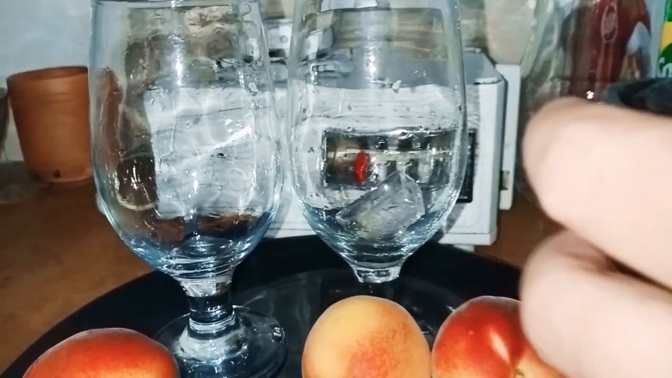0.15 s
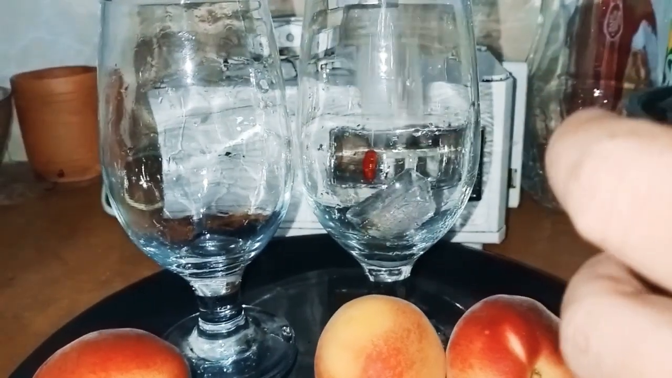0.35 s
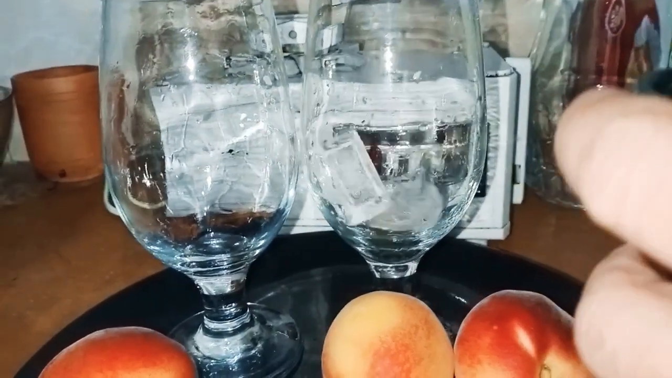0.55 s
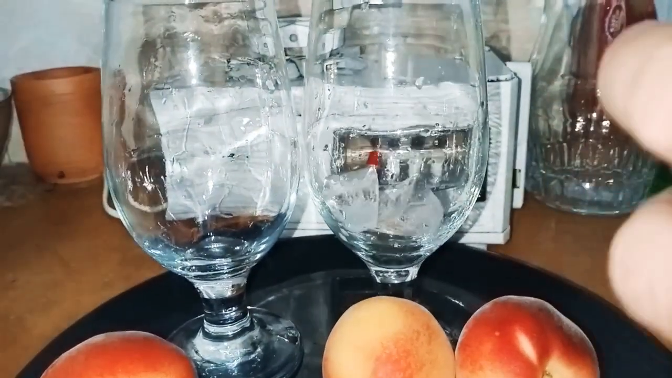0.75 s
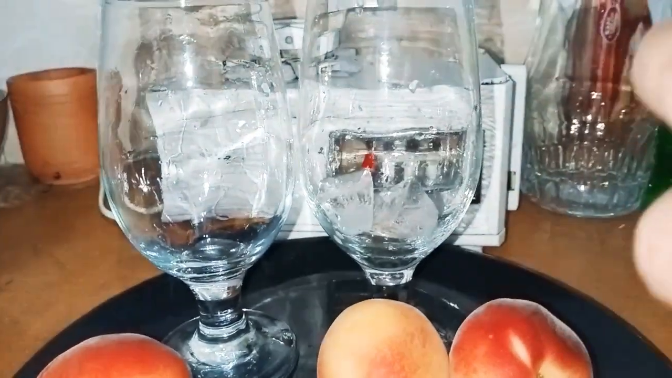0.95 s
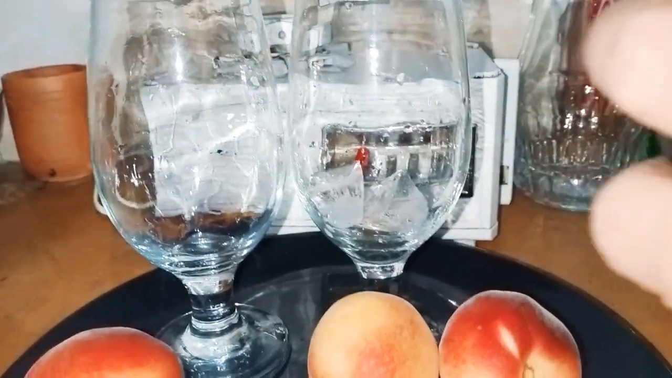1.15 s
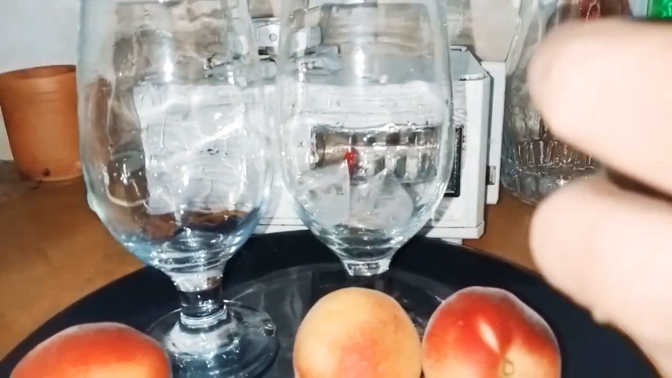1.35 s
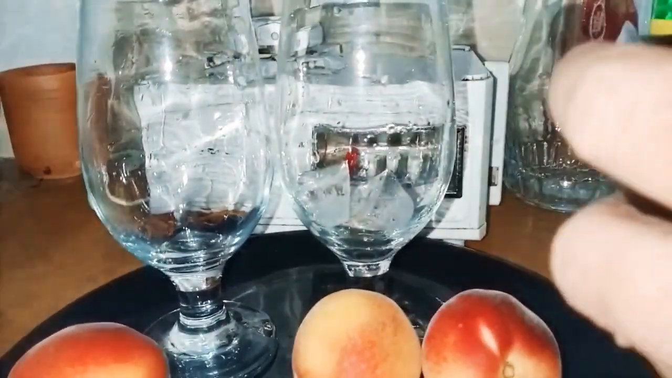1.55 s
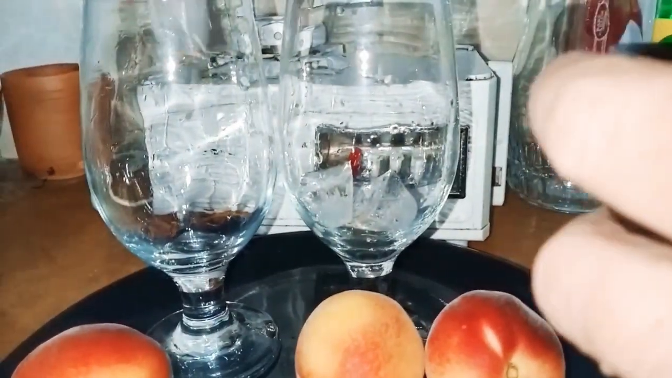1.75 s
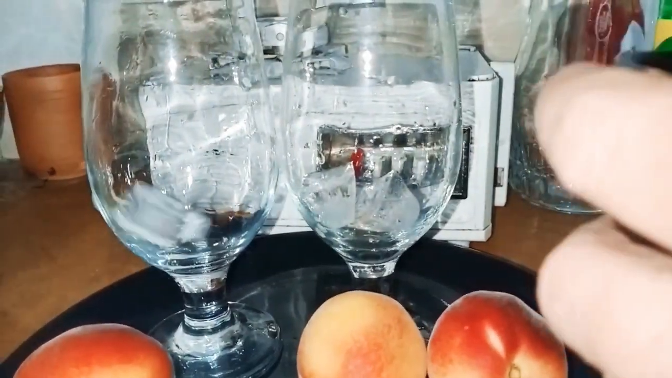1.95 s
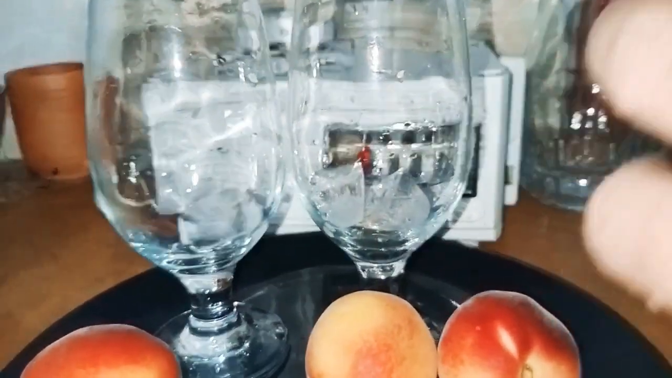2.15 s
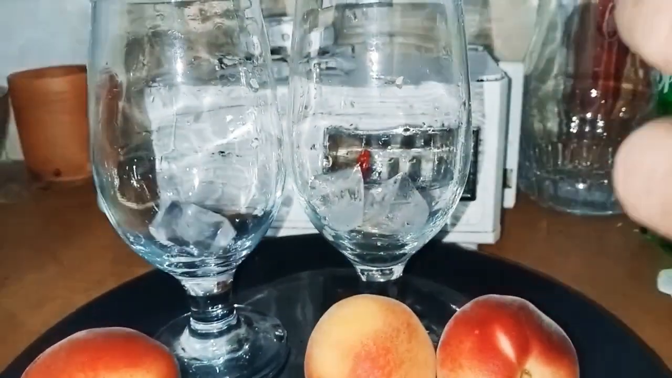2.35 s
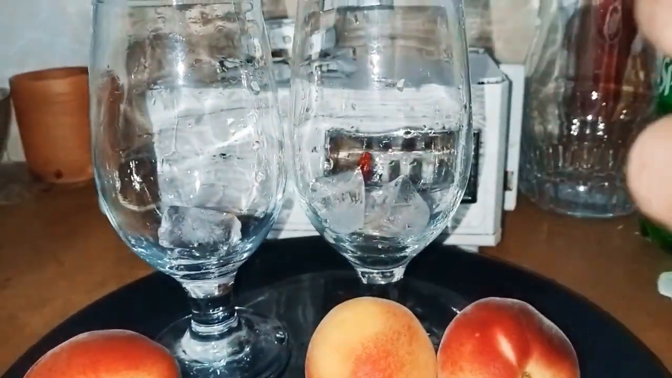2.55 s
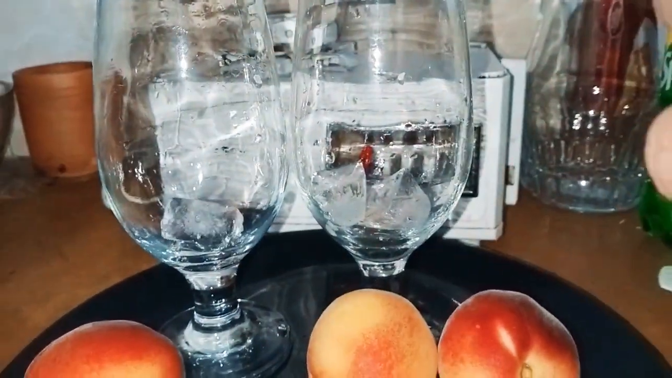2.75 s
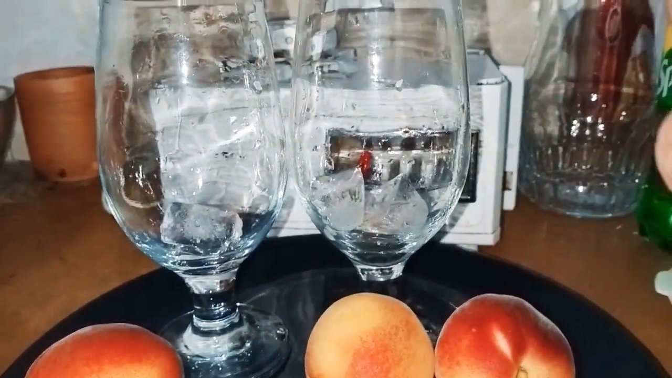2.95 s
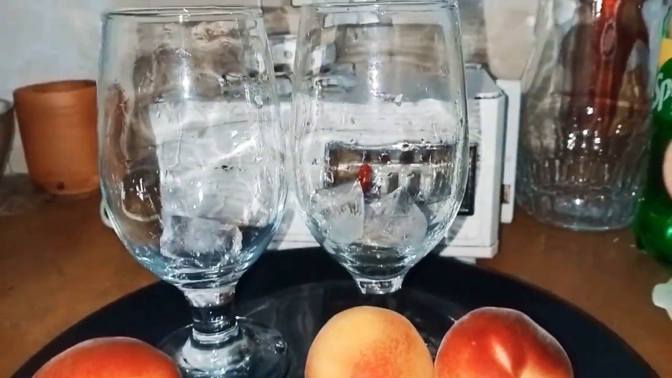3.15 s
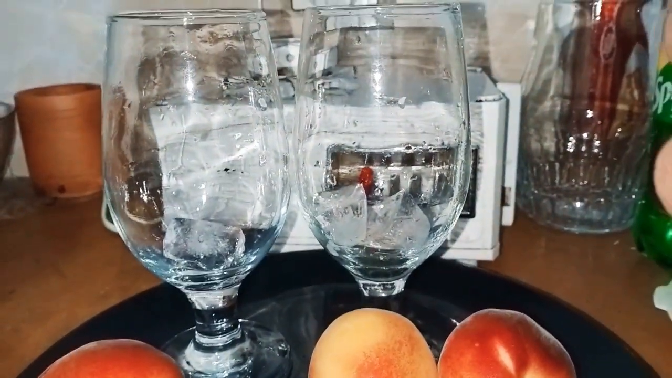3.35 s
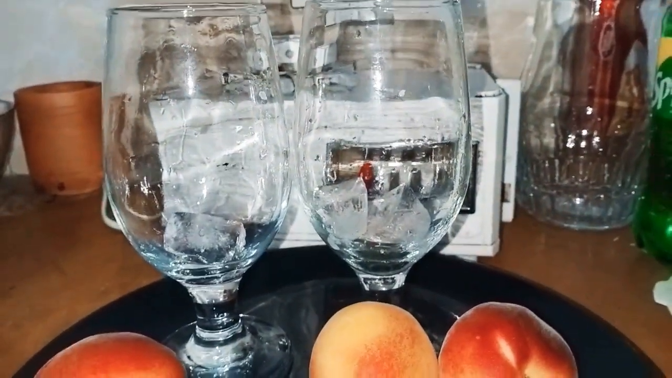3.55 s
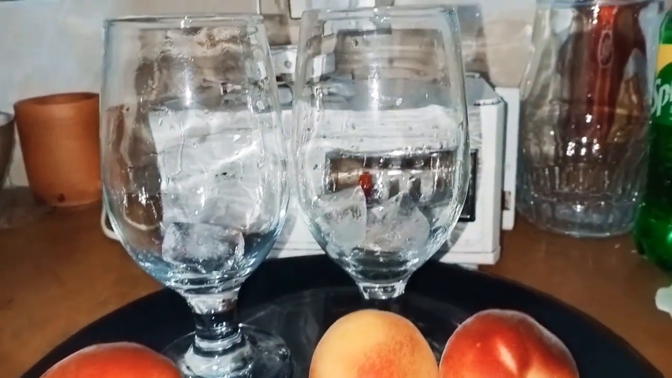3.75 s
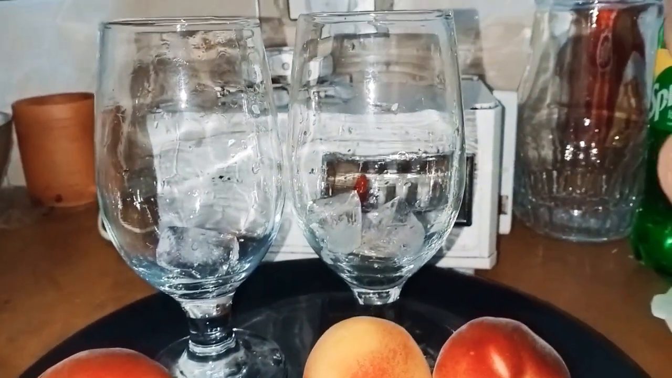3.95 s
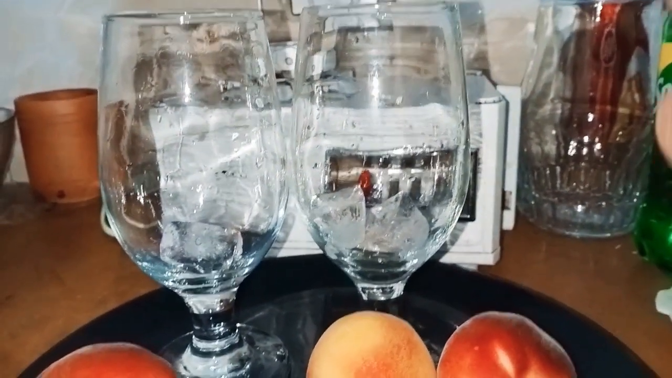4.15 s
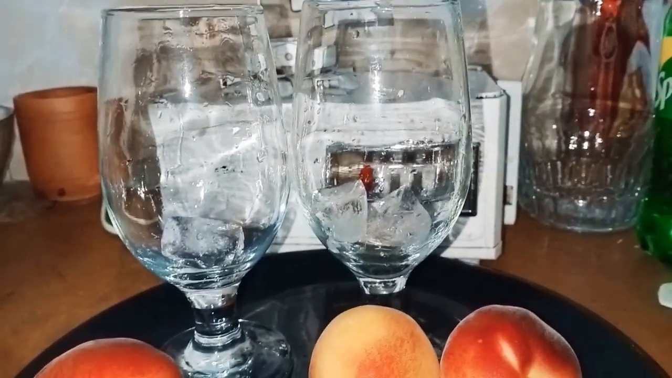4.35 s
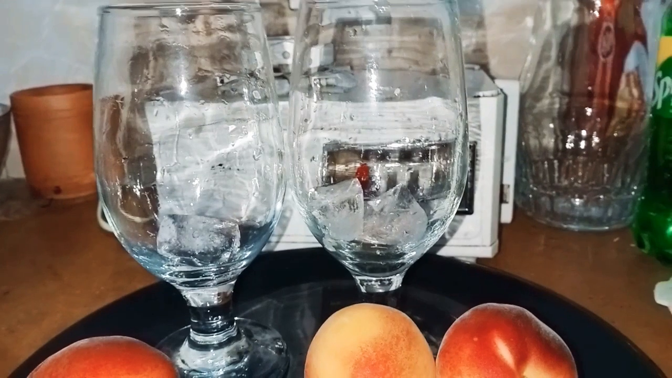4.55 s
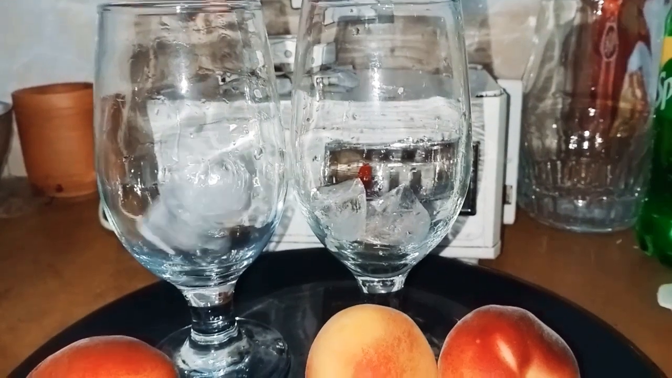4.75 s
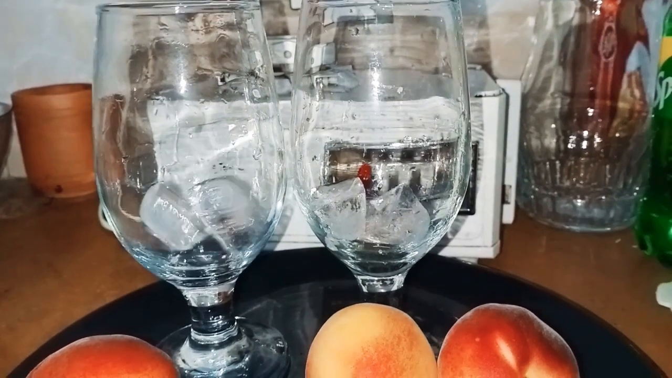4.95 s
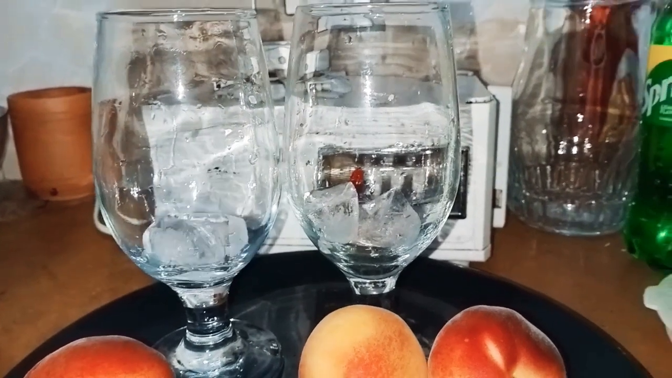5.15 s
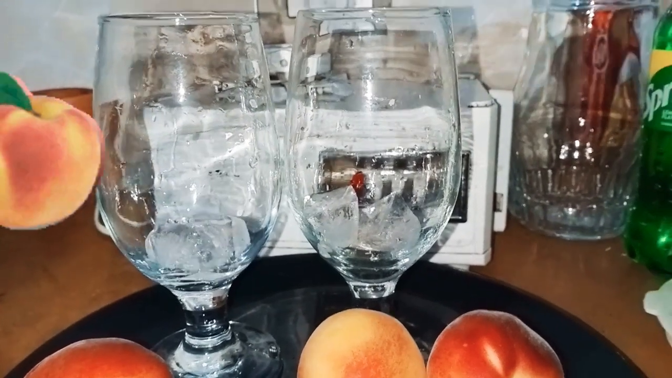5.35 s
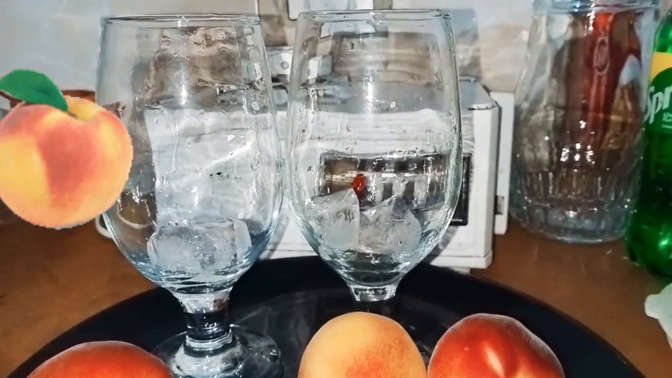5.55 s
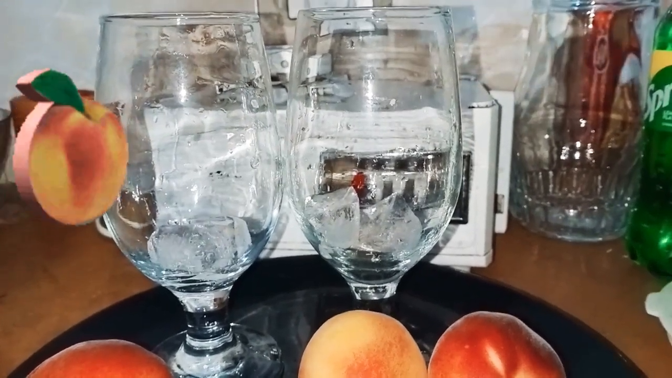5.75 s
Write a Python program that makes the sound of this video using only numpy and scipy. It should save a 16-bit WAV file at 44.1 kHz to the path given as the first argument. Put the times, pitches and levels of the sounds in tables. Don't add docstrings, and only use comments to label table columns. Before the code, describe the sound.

Ice cubes crack and clink into two stemmed glasses, ringing briefly, with rummaging clacks between drops, over a quiet refrigerator hum in a kitchen.

```python
import sys
import numpy as np
from scipy import signal
from scipy.fft import rfft, irfft
from scipy.io import wavfile
from scipy.ndimage import uniform_filter1d

SR = 44100
rng = np.random.default_rng(int(sys.argv[2]) if len(sys.argv) > 2 else 0)


def how_loud(loudness_db):
    steps = np.asarray(loudness_db, float) / 20
    return 10 ** steps


def put_to_file(sound):
    columns = np.atleast_2d(sound).T
    safe = np.clip(columns, -1, 1)
    whole_steps = np.round(safe * 32767)
    wavfile.write(sys.argv[1], SR, whole_steps.astype(np.int16))


N = 256044


def along(points, hz):
    f, v = np.transpose(points)
    return np.interp(np.log(hz + 1), np.log(f + 1), v)


def curve(rows):
    return np.interp(np.arange(N) / SR, *np.transpose(rows))


def noise(gain):
    x = irfft(rfft(rng.standard_normal(N)) * gain(np.fft.rfftfreq(N, 1 / SR)), N)
    return x / np.std(x)


# (centre [Hz], width [Hz], level [dB])
HUM_TONES = [
    (60.4, 70, -36),
    (100.6, 9, -1),
    (134.8, 26, 2.5),
    (161.5, 8.5, -4.5),
]
# (time [s], level [dB])
HUM_LEVEL = [(0.0, -45), (0.38, -51.5), (0.61, -51.5), (0.83, -55), (0.93, -51.5), (1.43, -51.5),
             (2.28, -45), (2.52, -48), (2.91, -45.5), (3.12, -50), (3.51, -50.5), (3.66, -50.5),
             (3.95, -51), (4.16, -49), (4.29, -50.5), (4.5, -49)]
# (frequency [Hz], level [dB per Hz])
HISS_COLOUR = [(110, -36.5), (190, -6), (220, 0), (343, -2.5), (376, -2.5), (704, -11), (1200, -8.5),
               (2560, -18), (3770, -15), (5250, -29), (6800, -17), (9660, -30), (15600, -40.5)]


def kitchen():
    def tones(f):
        return sum(how_loud(db) / (1 + ((f - centre) / width * 2) ** 2) for centre, width, db in HUM_TONES)

    hum = how_loud(curve(HUM_LEVEL)) * noise(tones)
    hiss = noise(lambda f: how_loud(along(HISS_COLOUR, f)))
    return hum + how_loud(-50.5) * hiss


def causal(gain_db, size=512):
    c = irfft(np.log(how_loud(gain_db(np.fft.rfftfreq(size, 1 / SR) + 1)) + 1e-6))
    c[1:size // 2] *= 2
    c[size // 2 + 1:] = 0
    h = irfft(np.exp(rfft(c)))
    return h / np.linalg.norm(h)


def ringing(hz, db, t60, t, attack, since=0):
    hz, db, t60 = hz[:, None], db[:, None], np.maximum(t60, .003)[:, None]
    fade = np.float32(-np.log(1000) * t / t60)
    turn = np.float32(2 * np.pi * hz * (t + since))
    modes = np.float32(how_loud(db)) * np.exp(fade) * np.sin(turn)
    return modes.sum(axis=0) * (1 - np.exp(-t / attack))


def chatter(length):
    x = uniform_filter1d(rng.standard_normal(length), round(.0016 * SR))
    return x / np.std(x)


# (frequency [Hz], t60 [s])
ROOM_T60 = [
    (300, .4),
    (2000, .28),
    (6000, .3),
    (15000, .14),
]


def echo(x, length):
    hz, t, z = signal.stft(rng.standard_normal(length), SR, nperseg=256)
    fade = how_loud(-60 * t / along(ROOM_T60, hz)[:, None])
    tail = signal.istft(z * fade, SR, nperseg=256)[1]
    late = np.pad(x, (130, 0))
    return signal.fftconvolve(late, tail / np.linalg.norm(tail))[:len(x)]


def hits(table, modes, family_hz, colour, blur, ring_db, clack_db, crack_db, crack_t60, rattle_db,
         focus_db, room_db, damp_db, rise, flutter):
    out, wall = np.zeros((2, N + SR))
    t = np.arange(SR) / SR
    hz, level, t60 = np.transpose(modes)
    slow = t60 > .4
    fast_hz, fast_t60 = hz[~slow], t60[~slow]
    for s, db, centre_hz, *family_db in sorted(table):
        luck = rng.standard_normal((6, 20))
        short = t[:SR // 10 if db < -18 and max(family_db) < -12 else SR // 5]
        n = len(short)
        strength = level + ring_db + np.interp(np.log(hz), np.log(family_hz), family_db)
        strength = strength + np.where(slow, 1.5, 3) * luck[0, :len(hz)]
        fast_db = strength[~slow]
        centre_hz = max(centre_hz, 2500)

        def contact_db(f):
            octaves = np.log2(f / centre_hz)
            above = np.maximum(octaves, 0)
            return along(colour, f) - focus_db * (.6 * np.abs(octaves) + 1.4 * above) + .12 * db * above

        cube_hz = centre_hz * np.exp(.23 * luck[1, :9])
        cube_db = clack_db + contact_db(cube_hz) + 4 * luck[2, :9]
        clack = ringing(cube_hz, cube_db, .02 * np.exp(.3 * luck[3, :9]), short, .0006)

        shape = how_loud(crack_db - 60 * short / crack_t60) + how_loud(rattle_db - 60 * short / .052)
        burst = rng.standard_normal(n) * shape * (1 - np.exp(-short / rise))
        crack = signal.fftconvolve(burst, causal(contact_db))[:n]

        ring = ringing(fast_hz, fast_db - 3, fast_t60, short, .0023)
        for row in luck[4:]:
            shifted_hz = fast_hz + blur * fast_hz ** 2 / 8000 * row[:len(fast_hz)]
            ring = ring + ringing(shifted_hz, fast_db - 6, fast_t60, short, .0016)
        ring = ring * (.63 + .6 * how_loud(-60 * short / .19))
        ring = ring * (1 + flutter * chatter(n)) / np.hypot(1, flutter)

        start = round(s * SR)
        reflected = how_loud(room_db) * echo(clack + crack + ring, n)
        out[start:][:n] += how_loud(db) * (clack + crack + reflected)
        smother_db = damp_db * np.clip(1.5 + db / 35, 0, 1)
        wall[start:][:SR] *= how_loud(-smother_db * (1 - np.exp(-t / .0039)))
        wall[start:][:n] += how_loud(db) * ring
        if slow.any():
            bell = ringing(hz[slow], strength[slow], t60[slow], t, .00015, since=s)
            wall[start:][:SR] += how_loud(db) * bell * np.cos(t * np.pi / 2)
    return (out + wall)[:N]


def in_bowl(table, second_db):
    return [(s, db, 3400, bell, upper + second_db, upper) for s, db, bell, upper in table]


GLASS_HZ = [1513, 1574, 4065, 4208, 6950, 7084, 8590, 9857, 10090, 10230, 13430, 13590, 14330, 14830]
FAMILY = [0, 0, 1, 1, 1, 1, 2, 2, 2, 2, 1, 1, 2, 2]
MEMBER = [0, 0, -1, 1, -1, 1, 0, -1, 0, 1, 0, 0, -1, 1]
# (time [s], level [dB])
SIDE_STRUCK = [
    (.44, 9),
    (.54, 8),
    (.62, 2),
    (.87, -7),
    (1.9, -2),
    (2.09, 0),
    (2.13, 3),
    (2.37, -2),
]


def in_empty_bowl(table, glass):
    member = np.array(MEMBER)
    rows = []
    for s, db, *family_db in table:
        side = np.interp(s, *np.transpose(SIDE_STRUCK))
        lean_db = -np.abs(side * (np.sign(side) - member)) * np.abs(member)
        clack_hz = 3200 * 2 ** (-db * .03)
        rows.append((s, db, clack_hz, *(np.array(family_db)[FAMILY] + lean_db)))
    return rows, [(hz, *mode) for hz, mode in zip(GLASS_HZ, glass)], GLASS_HZ


# (time [s], peak [dB], bell pair [dB], rim modes [dB], belly modes [dB])
RIGHT_HITS = [(.4005, -9, -25.5, -38, -38), (.4035, -3, -25.5, -36, -36), (.4125, -3, -25.5, -34, -30),
              (.424, -4.5, -25, -30, -30), (.4364, -2, -9.5, -7, -13), (.4665, -15.5, -19, -20, -29),
              (.501, -9, -9, -19, -16), (.537, -18.5, -7.5, -5, -16), (.6, -13, -14.5, -18.5, -17),
              (.622, -29, -14, -2, -10), (.691, -11, -27, -31, -31), (.7244, -19, -18, -35, -30),
              (.782, -40, -5, -16, -16), (.8695, -28, 1, -3, -4), (.8863, -20, -20, -20, -16.5),
              (.9385, -29, -16, -37, -37), (1.0773, -35, -30, -22, -16), (1.1272, -36.5, -7.5, -19, -19)]
LEFT_HITS = [(1.8825, -3.5, -9, -14, -10), (1.9055, -1, -28, -21, -8), (1.92, -16.5, -8, -20, 1),
             (1.9782, -31, 4, -20, -7), (2.04, -40, -3, -20, -6), (2.0773, -18, -18.5, -20, -20),
             (2.0915, -11.5, 1.5, 1, -7), (2.126, -20.5, -38, -4, -8), (2.2494, -25, -1, -22, -14),
             (2.2644, -25, -9, -33, -33), (2.337, -37, 5, -16, -16), (2.3736, -28, 7, 2, -4),
             (2.388, -37.5, 6, 5, 8), (4.6217, -37, -15.5, -10, -5), (4.658, -35, -17.5, -20, -20)]
# (level [dB], t60 [s])
RIGHT_GLASS = [(-4, 1.2), (-3.5, .48), (-2, .36), (-5, .3), (-7, .15), (-4, .09), (-7, .12), (-15, .1),
               (-16, .1), (-12, .12), (-15, .09), (-16, .08), (-19, .1), (-13, .13)]
LEFT_GLASS = [(-5, 1.2), (-5, .69), (-9, .3), (-10, .24), (-10, .16), (-10, .14), (-5, .14), (-12, .12),
              (-13, .12), (-10, .13), (-16, .11), (-20, .11), (-15, .1), (-12, .12)]
# (time [s], peak [dB], bell pair [dB], upper modes [dB])
LAST_HITS = [(4.735, 0.5, -22, -34), (4.7774, -3, -30, -34.5), (4.804, -8, -13, -18),
             (4.8294, -18, -23, -26.5), (4.9967, -24, -11, -27), (5.0041, -18, -14, -21.5),
             (5.029, -22.5, -15, -27), (5.0521, -18.5, -17.5, -20), (5.0595, -18, -24, -22),
             (5.082, -19.5, -21.5, -27.5), (5.0994, -25, -19, -39), (5.1193, -28, -11.5, -28.5),
             (5.1494, -30.5, -13, -41)]
# (frequency [Hz], level [dB], t60 [s])
FULL_GLASS = [(661, -7, .14), (870, -10, .03), (1534, -14, .6), (1510, -2, .9), (1860, 0, .1),
              (3443, -2, .1), (4200, -4, .15), (5600, -14, .12), (6900, -3, .1), (8500, -8, .083),
              (9900, -4, .05), (10120, -4, .092), (14800, 0, .12)]
# (frequency [Hz], level [dB per Hz])
CRACK_COLOUR = [(120, -58), (200, -22.5), (617, -2.5), (1110, -7), (1440, 1), (3700, -9.5), (4790, -15.5),
                (8490, -9.5), (12100, -24.5), (15000, -23.5), (16500, -44.5)]


def glasses():
    right = hits(*in_empty_bowl(RIGHT_HITS, RIGHT_GLASS), CRACK_COLOUR, blur=.006, ring_db=-2.5,
                 clack_db=-12.5, crack_db=-9, crack_t60=.016, rattle_db=-16, focus_db=2.5,
                 room_db=-6.5, damp_db=7.5, rise=.0012, flutter=.35)
    left = hits(*in_empty_bowl(LEFT_HITS, LEFT_GLASS), CRACK_COLOUR, blur=.007, ring_db=-6,
                clack_db=-31, crack_db=-5, crack_t60=.022, rattle_db=-23.5, focus_db=2.5,
                room_db=-7, damp_db=12.5, rise=.0022, flutter=.35)
    last = hits(in_bowl(LAST_HITS, second_db=-2), FULL_GLASS, [1550, 4150, 8000], CRACK_COLOUR,
                blur=.006, ring_db=-6, clack_db=-20, crack_db=-8.5, crack_t60=.034, rattle_db=-22.5,
                focus_db=4, room_db=-9.5, damp_db=2.5, rise=.0008, flutter=.6)
    return right + left + last


# (time [s], frequency [Hz], level [dB], t60 [s])
NOTES = [(.424, 3670, -13.5, 0.043), (.467, 2300, -25, 0.042), (0.502, 2703, -17.5, 0.067),
         (.501, 3610, -7, 0.017), (0.724, 3690, -18, 0.021), (1.907, 3058, -17.5, 0.18),
         (1.908, 3375, -18, 0.16), (1.906, 680, -30.5, 0.13), (2.095, 3990, -25, 0.08),
         (2.093, 2920, -34, 0.19), (2.25, 3770, -28, 0.057), (3.07, 7340, -37, 0.034),
         (3.572, 8900, -28, 0.037), (3.73, 3600, -23, 0.072), (3.729, 5800, -12, 0.018),
         (3.731, 8600, -17.5, 0.028), (3.791, 2940, -12, 0.021), (3.808, 2546, -34, 0.11),
         (4.621, 6990, -38, 0.044), (4.622, 9900, -46, 0.062), (4.736, 3070, -16.5, 0.037),
         (5.063, 3540, -20, 0.048), (5.082, 5600, -38, 0.097), (.44, 8710, -20, .11),
         (.44, 15300, -36, .12), (3.297, 4300, -30, .04), (3.61, 1700, -30, .035), (3.697, 1600, -42, .15),
         (3.731, 1580, -13, .09), (3.735, 12550, -51, .15), (3.7298, 1700, -8, .008),
         (3.572, 1650, -28, .04), (1.884, 14800, -27, .05), (1.884, 4100, -20, .06), (1.907, 3480, -24, .1),
         (1.91, 2600, -24, .07), (3.32, 2300, -25, .12), (1.075, 3900, -36, .04), (1.02, 3550, -42, .08)]


def notes():
    out, t = np.zeros(N + SR), np.arange(SR // 5) / SR
    for s, hz, db, t60 in NOTES:
        pair_hz = hz * (1 + np.array([0, .012]) * rng.standard_normal())
        note = ringing(pair_hz, db - np.array([2, 8]), np.full(2, t60), t, .001)
        note = note * (.95 + .25 * chatter(len(t)))
        out[round(s * SR):][:len(t)] += note + how_loud(-13) * echo(note, len(t))
    return out[:N]


def in_dish(table):
    rows = []
    for s, db, hz, ring in table:
        low_db = ring - 6.5 * np.log2(hz / 2500)
        upper_db = ring + .5 * db
        rows.append((s, db, hz, low_db, upper_db + 7, upper_db + 13))
    return rows


# (time [s], peak [dB], clack centre [Hz], ring [dB])
DISH_HITS = [(.808, -30.5, 13500, -35), (1.025, -42, 8400, 2), (1.052, -36, 8400, 4), (1.066, -35, 8400, 3),
             (1.09, -42, 8400, 3), (1.14, -43, 8400, 3), (1.175, -43, 8400, 2), (2.02, -28, 7000, -30),
             (2.7501, -22.5, 1807, -18), (2.8694, -32.5, 2220, -7), (2.9437, -15, 2245, -20),
             (3.0694, -25.5, 3520, -23), (3.13, -32, 2000, -5), (3.3, -19.5, 4270, -16.5),
             (3.3181, 0, 6500, -13), (3.4029, -25, 3500, -11), (3.4697, -27, 2500, -11),
             (3.482, -23.5, 2940, -15), (3.5718, -15.5, 8420, -13.5), (3.718, -36, 7940, 0),
             (3.7295, -1, 4500, -23), (3.7462, -23, 3530, -16), (3.935, -30, 7730, -13),
             (4.577, -21, 7150, -23.5), (4.587, -19, 7000, -26)]
# (time [s], peak
# [dB], clack centre [Hz])
CUBE_TICKS = [(.886, -24, 3100), (1.05, -36, 3000), (1.062, -35, 2500), (1.085, -36, 3300),
              (1.163, -38, 4000), (2.068, -32, 2500), (2.104, -24, 2600), (2.115, -25, 2500),
              (2.138, -27, 2800), (2.152, -31, 2600), (2.772, -35, 3070), (2.9773, -36, 2560),
              (3.0202, -30.5, 2650), (3.0826, -33, 4360), (3.2528, -29.5, 2500), (3.268, -30, 3500),
              (3.296, -29, 4200), (3.49, -35, 2600), (3.786, -20, 2800), (3.7923, -11.5, 2800),
              (3.808, -20, 2730), (3.8294, -28, 2960), (3.849, -25, 2810), (4.062, -35, 2930),
              (4.089, -31, 3020), (4.0955, -19, 2780), (4.11, -40, 2930), (4.131, -28, 2930),
              (4.151, -31.5, 3100), (5.056, -19.5, 4000), (5.066, -16.5, 3400), (5.075, -20, 3000),
              (5.09, -22.5, 3600), (5.108, -25, 3330), (5.132, -29, 3600), (5.16, -34, 3280)]
# (frequency [Hz], level [dB], t60 [s])
DISH_MODES = [(1535, 5.5, 0.092), (1668, 6.5, 0.053), (2300, -12.5, .12), (3170, -6, 0.07), (3600, -1, .08),
              (4000, -12.5, 0.053), (5205, 2.5, 0.22), (5150, -2, 0.16), (6770, -13, .05),
              (7900, -12.5, 0.099), (8140, 4, 0.051), (8360, -4.5, 0.1534), (8600, -5.5, 0.114),
              (12550, -27, 0.13)]
# (frequency [Hz], level [dB per Hz])
TICK_COLOUR = [(290, -58.5), (500, -17.5), (859, -48.5), (1500, -4.5), (4550, -4), (5120, -15),
               (6280, -9.5), (8300, -3), (9600, -21), (12900, -20), (16500, -38)]


def dish():
    family_hz = [1900, 5200, 8300]
    loose = [(*row, -24) for row in CUBE_TICKS]
    ticks = hits(in_dish(loose), DISH_MODES, family_hz, TICK_COLOUR, blur=.019, ring_db=-16,
                 clack_db=-16, crack_db=-3.5, crack_t60=.012, rattle_db=-30.5, focus_db=10.5,
                 room_db=-11, damp_db=2, rise=.00091, flutter=.83)
    strikes = hits(in_dish(DISH_HITS), DISH_MODES, family_hz, TICK_COLOUR, blur=.019, ring_db=-17.5,
                   clack_db=-18.5, crack_db=-4, crack_t60=.0087, rattle_db=-23.5, focus_db=3.5,
                   room_db=-10.5, damp_db=5, rise=.0004, flutter=.54)
    return ticks + strikes


# (time [s], frequency [Hz], level [dB])
KNOCKS = [
    (4.556, 154, -23),
    (4.574, 165, -17.5),
    (4.578, 365, -23.5),
    (4.585, 139, -19),
]


def counter():
    t = np.arange(N) / SR
    push = np.zeros(N)
    for s, hz, db in KNOCKS:
        since = np.maximum(t - s, 0)
        push += how_loud(db - 60 * since / .033) * np.sin(2 * np.pi * hz * since)
    puff = how_loud(-38) * np.exp(-((t - 4.583) / .008) ** 2)
    brush = how_loud(-53.5) * (np.abs(t - 4.578) < .028)
    return push + (puff + brush) * noise(lambda f: how_loud(along(CRACK_COLOUR, f) * .4))


def scene():
    mono = kitchen() + glasses() + notes() + dish() + counter()
    return np.array([mono, mono])


def top_cut(x):
    return signal.sosfilt(signal.butter(12, 16830, fs=SR, output="sos"), x)


# (from [s], to [s], level [dB])
SPLIT = [
    (2.887, 3.06, -40),
    (3.576, 3.68, -22),
    (3.733, 3.81, -15.5),
    (4.59, 4.67, -22.5),
    (4.727, 4.81, -17.5),
]
# (time [s], level [dB])
GATE = [
    (0, -18),
    (.05, -3),
    (.08, 0),
    (4.854, 0),
    (4.857, -120),
    (4.994, -120),
    (4.997, 0),
    (5.294, 0),
    (5.297, -120),
]


def record(dry):
    x = signal.sosfilt(signal.butter(3, 48, "high", fs=SR, output="sos"), dry)
    t = np.arange(N) / SR
    split = sum(how_loud(db) * (t > a) * (t < b) for a, b, db in SPLIT)
    side = x[0] * noise(lambda f: f < 500) * split
    side = signal.sosfiltfilt(signal.butter(8, 4600, "high", fs=SR, output="sos"), side)
    x = (x + [side, -side]) * how_loud(curve(GATE))
    x = x / (1 + np.abs(x / .95) ** 6) ** (1 / 6)
    treble = np.where(np.fft.rfftfreq(N, 1 / SR) < 15600, 1, how_loud(-24))
    x = irfft(rfft(x) * treble, N)
    x = x * np.minimum(how_loud(curve(GATE) + 20), 1)
    return top_cut(x)


dry = scene()
out = record(dry)
put_to_file(out)
```